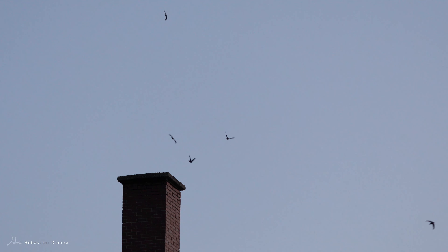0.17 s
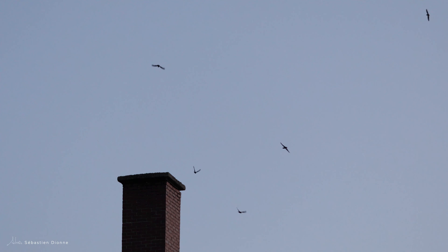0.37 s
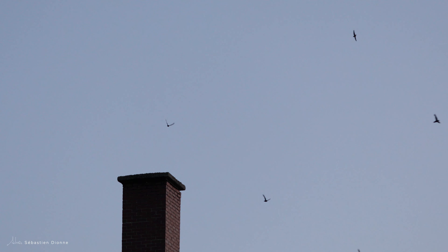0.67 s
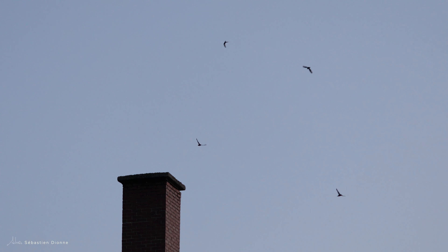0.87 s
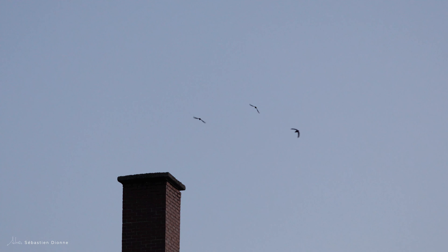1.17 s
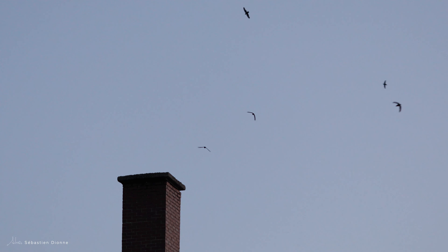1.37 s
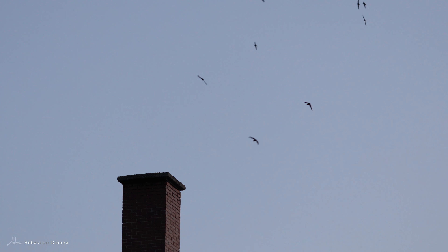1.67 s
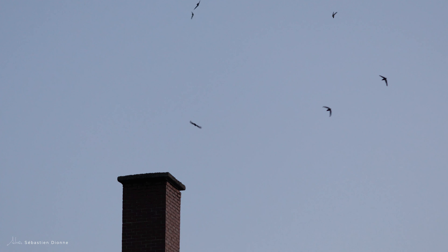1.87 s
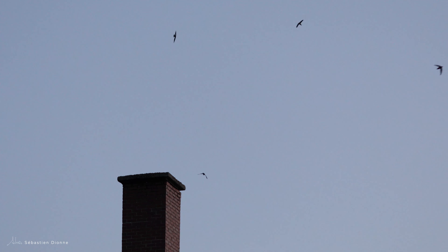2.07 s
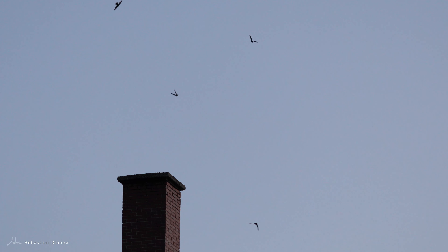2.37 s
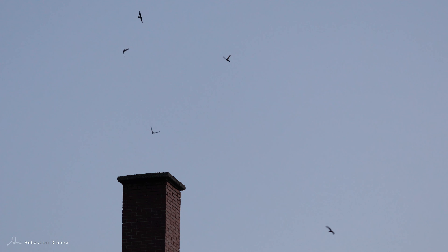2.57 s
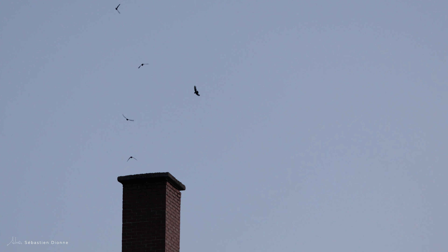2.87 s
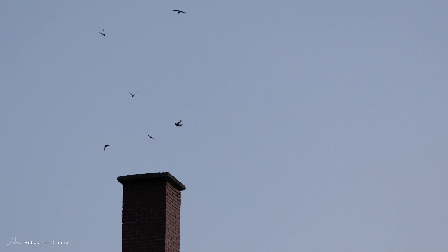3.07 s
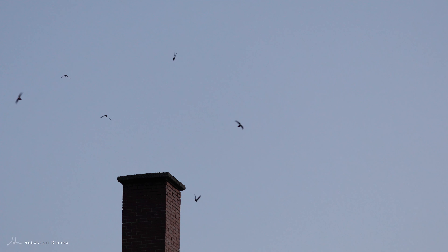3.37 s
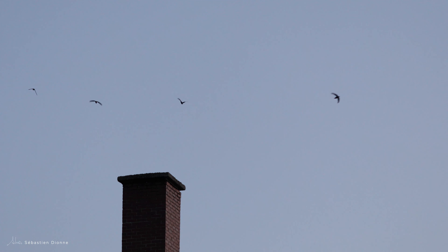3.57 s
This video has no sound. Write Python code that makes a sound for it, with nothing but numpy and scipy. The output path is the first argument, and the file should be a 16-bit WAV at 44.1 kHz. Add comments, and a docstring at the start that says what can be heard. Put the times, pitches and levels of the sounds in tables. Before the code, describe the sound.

A slowly approaching car crunches over gravelly ground, with cricket chirps and faint bird ticks

```python
"""Thin falling bird ticks open the scene, over a cricket that chirps in threes at dusk above the roofs.
The ticks are short hoarse sine glides; each chirp is three swelling tones, one for each wing stroke.
A car rolls slowly nearer: grainy coloured noise makes roar, crunch and sizzle, smooth coloured noise
a low drone, damped rings the popping stones, and bursts of banded noise the clicks of grit.
Distant traffic rumbles underneath as low coloured noise, with a steady wash of air."""
import sys
import numpy as np
from scipy import signal
from scipy.fft import rfft, irfft, next_fast_len
from scipy.io import wavfile
from scipy.ndimage import map_coordinates

SR = 44100
rng = np.random.default_rng(int(sys.argv[2]) if len(sys.argv) > 2 else 0)


def int16_out(signal):
    """Quantize to a 16-bit WAV file."""
    q = np.round(np.clip(np.atleast_2d(signal).T, -1, 1) * 32767)
    wavfile.write(sys.argv[1], SR, q.astype(np.int16))


N = 164052

# crunch of the tread on grit, which the sharp grains follow: start_s [s], level_db [dB]
CRUNCH_LEVEL = [(0, -65.5), (1.42, -70), (1.53, -63), (1.6, -69), (1.71, -62), (1.78, -61.5), (1.9, -54.5),
                (2.09, -63), (2.18, -52.5), (2.26, -53.5), (2.35, -54.5), (2.46, -57.5), (2.62, -55.5),
                (2.8, -55), (2.92, -51), (3.05, -52), (3.3, -49), (3.72, -52)]


def amp(db):
    """Decibels to gain."""
    return 10 ** (np.asarray(db) / 20)


def unit(x):
    """Scale to rms 1."""
    return x / np.sqrt(np.mean(x ** 2) + 1e-20)


def add(track, start_s, sound):
    """Mix a sound into the track at start_s, trimming what falls outside it."""
    start = round(start_s * SR)
    part = sound[max(-start, 0):max(N - start, 0)]
    first = max(start, 0)
    track[first:first + len(part)] += part


def wobble(rate, size):
    """A smooth random curve, rate knots a second."""
    knots = rng.standard_normal(int(size * rate / SR) + 4)
    return map_coordinates(knots, [np.arange(size) * rate / SR])


def level(points):
    """Gain per sample, in straight dB lines between (s, dB) points."""
    return amp(np.interp(np.arange(N) / SR, *np.transpose(points)))


def coloured(x, points):
    """x through a causal minimum-phase filter with the spectrum of (Hz, dB) points, at rms 1."""
    m = 2 * next_fast_len(N // 2 + 4096)
    hz, db = np.transpose(points)
    gain_db = np.interp(np.log(np.fft.rfftfreq(m, 1 / SR) + 1), np.log(hz), db)
    cepstrum = irfft(np.log(amp(gain_db)), m)
    # folding the cepstrum onto positive time makes the filter causal
    fold = np.r_[1, np.full(m // 2 - 1, 2), 1, np.zeros(m // 2 - 1)]
    response = np.exp(rfft(cepstrum * fold))
    return unit(irfft(rfft(x, m) * response, m)[:N])


def outdoors(x, wet_db):
    """The sound plus its faint scatter off walls and roofs, as a decaying noise tail."""
    yard_t60_s = 0.51
    t = np.arange(SR // 2) / SR
    tail = rng.standard_normal(len(t)) * amp(-60 * t / yard_t60_s)
    tail /= np.linalg.norm(tail)
    return x + amp(wet_db) * signal.fftconvolve(x, tail)[:N]


def gritty(share):
    """Smooth rolling noise mixed with the impulses of single grains; share sets the grain part."""
    grains_per_s, spread_db = 420, 4
    sizes = amp(spread_db * np.minimum(rng.exponential(size=N), 3)) * rng.choice([-1, 1], N)
    grains = unit(sizes * (rng.random(N) < grains_per_s / SR))
    share = np.clip(share, 0, 1)
    return share * grains + np.sqrt(1 - share ** 2) * rng.standard_normal(N)


def tyres():
    """The nearing car: a mid roar, a brighter crunch, a fine grainy sizzle that swells late, a low drone."""
    # tyre roar: start_s [s], level_db [dB]
    roar_level = [(0, -72), (.9, -69), (1.1, -60.5), (1.47, -59.5), (1.52, -52.5), (1.58, -57.5),
                  (1.69, -54.5), (1.77, -52.5), (1.92, -53.3), (2.08, -52.3), (2.23, -51.5), (2.42, -53),
                  (2.7, -51), (3.05, -51.5), (3.3, -49), (3.58, -47.5), (3.72, -48)]
    # spectrum of the roar: freq_hz [Hz], density_db [relative dB per Hz]
    roar_colour = [(70, -59.5), (220, -16), (370, -13), (435, -9), (540, -7.5), (640, 3), (730, -1),
                   (850, 0.5), (1150, 1.5), (1500, -4.5), (1900, -5.5), (2600, -29.5), (4000, -24.5),
                   (7500, -34.5), (15500, -68)]
    # spectrum of the crunch: freq_hz [Hz], density_db [relative dB per Hz]
    crunch_colour = [(80, -59), (400, -39), (900, -1.5), (1300, 3.5), (1900, 2), (2800, -4.5),
                     (4300, -15.5), (5800, -18.5), (7500, -16.5), (8600, -23), (10800, -21), (12500, -30),
                     (15500, -40)]
    # low drone of the nearing tyres: start_s [s], level_db [dB]
    drone_level = [(0, -72), (1.5, -69.5), (2.7, -63.5), (3.3, -57.5), (3.58, -59), (3.72, -56)]
    # spectrum of the drone: freq_hz [Hz], density_db [relative dB per Hz]
    drone_colour = [(40, -47), (85, -28.5), (165, -9), (230, -1.5), (370, -12), (435, 1.5), (480, 2.5),
                    (580, 1.5), (650, -3), (760, -14.5), (1500, -35)]
    # fine sizzle of sand, which carries only from close by: start_s [s], level_db [dB]
    sizzle_level = [(0, -105), (2.5, -79.5), (2.8, -70.5), (2.98, -70), (3.3, -67.5), (3.5, -71),
                    (3.72, -67.5)]
    # spectrum of the sizzle: freq_hz [Hz], density_db [relative dB per Hz]
    sizzle_colour = [(2500, -33), (5800, -4), (7400, 2.5), (8600, -0.5), (10600, 2), (12500, -8),
                     (15500, -31)]

    roar = level(roar_level) * coloured(gritty(share=0.25), roar_colour)
    crunch = level(CRUNCH_LEVEL) * coloured(gritty(share=0.6), crunch_colour)
    drone = level(drone_level) * coloured(rng.standard_normal(N), drone_colour)
    sizzle = level(sizzle_level) * coloured(gritty(share=0.37), sizzle_colour)
    unevenness = amp(0.77 * wobble(45, N))
    return (roar + crunch) * unevenness + sizzle + drone


def pops():
    """A stone snaps out from under the tread: a soft crack and a few dull cycles at its own pitch."""
    # stones popping under the tyres: start_s [s], peak_db [dB], pitch_hz [Hz]
    stones = [(1.5296, -38, 1250), (1.673, -41, 1150), (1.7006, -39, 1720), (1.7256, -39, 1460),
              (1.824, -43, 1210), (2.007, -40, 990), (2.162, -36, 1500), (2.2026, -28, 920),
              (2.2062, -39, 750), (2.266, -34, 1510), (2.307, -37, 1410), (2.5188, -30.5, 1160),
              (2.5216, -35, 1230), (2.676, -35.5, 1130), (2.681, -37, 1100), (2.7559, -35, 1310),
              (2.8953, -37.5, 1480), (3.188, -31.5, 1110), (3.3777, -31, 1230), (3.524, -34, 960),
              (3.5745, -36.5, 950)]
    # ring of stone and tread: ratio [multiple of the pitch], mode_db [dB], t60_s [s]
    ring_modes = [(.7, -7, .025), (1, 3, 0.017), (1.4, 2.5, 0.0063), (1.9, -4.5, 0.0046)]
    crack_db, crack_t60_s = -21, 0.0066
    out, t = np.zeros(N), np.arange(SR // 25) / SR
    band = signal.butter(3, (520, 2900), 'bandpass', fs=SR, output='sos')
    for start_s, peak_db, pitch_hz in stones:
        ring = sum(amp(mode_db - 60 * t / t60_s) * np.sin(2 * np.pi * pitch_hz * ratio * t)
                   for ratio, mode_db, t60_s in ring_modes)
        crack = amp(crack_db - 60 * t / crack_t60_s) * rng.standard_normal(len(t))
        pop = signal.sosfilt(band, ring + crack)
        add(out, start_s, amp(peak_db) * pop / np.abs(pop).max())
    return outdoors(out, wet_db=-12)


def wall(x):
    """A nearby wall repeats the road sound a few milliseconds later."""
    delay_s, echo_db = .00702, -12.5
    echo = np.pad(x, (round(delay_s * SR), 0))[:N]
    return x + amp(echo_db) * echo


def spitting():
    """Sparse sharp grains crack under the tread, louder as the crunch grows."""
    # spectrum of the sharp grains: freq_hz [Hz], density_db [relative dB per Hz]
    spit_colour = [(500, -23), (1500, 2), (4000, -1), (7500, 0.5), (11000, -4), (15500, -22)]
    grains_per_s, below_crunch_db, spread_db = 30, -20.5, 4.5
    sizes = amp(spread_db * np.minimum(rng.exponential(size=N), 2))
    grains = sizes * (rng.random(N) < grains_per_s / SR)
    return amp(below_crunch_db) * level(CRUNCH_LEVEL) * coloured(grains, spit_colour)


def clicks():
    """Tiny bright clicks of flung grit: decaying noise around a centre frequency."""
    # small sharp clicks: start_s [s], peak_db [dB], centre_hz [Hz]
    grit_hits = [(.7315, -56, 9600), (.8205, -50.5, 5500), (0.867, -51, 4376), (0.991, -50.5, 6500),
                 (1.2215, -51, 6500), (1.245, -51, 10000), (1.53, -54, 8600), (1.7, -49, 3000),
                 (2.2026, -48, 5500), (2.292, -43.5, 8300), (2.397, -47, 6900), (2.4414, -44.5, 7700),
                 (2.5183, -46.5, 7100), (2.645, -49, 9600), (2.757, -47, 5000), (2.871, -52, 8240),
                 (2.894, -51, 4960), (3.0156, -48, 10920), (3.308, -47, 9000)]
    t60_s, width_octaves, top_hz = 0.0081, 0.4, 12500
    out, t = np.zeros(N), np.arange(2048) / SR
    hz = np.fft.rfftfreq(len(t), 1 / SR) + 1
    treble_cut = 1 + (hz / top_hz) ** 8
    for start_s, peak_db, centre_hz in grit_hits:
        band = 1 / (1 + (np.log2(hz / centre_hz) / width_octaves) ** 2) / treble_cut
        click = irfft(rfft(rng.standard_normal(len(t))) * band) * amp(-60 * t / t60_s)
        add(out, start_s, amp(peak_db) * click / np.abs(click).max())
    return out


def cricket():
    """Each wing stroke is a swelling tone with an overtone; it rises a little, then sags as the file slows."""
    # chirps: start_s [s], level_db [dB], pitch_hz [Hz], first_db [extra dB on the first stroke]
    chirp_table = [(-.050, -53, 5400, 8), (0.366, -53, 5420, 4.5), (0.8427, -53, 5410, 1.5),
                   (1.301, -52.5, 5420, 2.5), (1.799, -52.5, 5400, 2), (2.768, -52.5, 5400, -0.5),
                   (3.3255, -52.5, 5400, 2)]
    # wing strokes of a chirp: delay_s [s after its start], length_s [s], stroke_db [relative dB],
    # offset_hz [Hz from the chirp's pitch], sag_hz [Hz]
    wing_strokes = [(0, 0.0178, -1, -65, 460), (.0325, 0.023, 3, 9, 610), (.0715, 0.0238, 3.5, 24, 630)]
    swell_power, overtone_db, tooth_rough = 0.57, -19.5, 0.088
    rise_hz = 60.3
    sag_from, sag_curve = .33, 1.55  # share of the stroke where slowing begins, and how it steepens
    out = np.zeros(N)
    for start_s, level_db, pitch_hz, first_db in chirp_table:
        for k, (delay_s, length_s, stroke_db, offset_hz, sag_hz) in enumerate(wing_strokes):
            u = np.linspace(0, 1, int(length_s * SR))  # progress through the stroke
            starting = np.maximum(1 - u / sag_from, 0)
            slowing = np.maximum((u - sag_from) / (1 - sag_from), 0) ** sag_curve
            hz = pitch_hz + offset_hz - rise_hz * starting - sag_hz * slowing
            phase = 2 * np.pi * np.cumsum(hz) / SR
            roughness = 1 + tooth_rough * wobble(900, len(u))
            swell = np.abs(np.sin(np.pi * u)) ** swell_power * roughness
            # the overtone is swelled twice, so it is strongest mid-stroke
            tone = np.sin(phase) + amp(overtone_db) * swell * np.sin(2 * phase)
            gain = amp(level_db + stroke_db + first_db * (k == 0))
            add(out, start_s + delay_s, gain * swell * tone)
    return outdoors(out, wet_db=-19.5)


def birds():
    """Short, slightly hoarse whistles that fall fast and fade, rough in both phase and loudness."""
    # bird ticks: start_s [s], length_s [s], from_hz [Hz], to_hz [Hz], level_db [dB]
    tick_table = [(.008, .016, 6300, 5230, -56), (.085, .012, 6450, 6100, -63),
                  (.094, .018, 5100, 3900, -66), (.119, .012, 6200, 5400, -65),
                  (.148, .0095, 6370, 5900, -65), (.2145, 0.014, 7700, 6750, -56),
                  (0.22, .017, 6600, 4200, -65), (.288, 0.013, 6600, 6150, -55.5),
                  (.326, 0.019, 6650, 5050, -56.5), (0.341, .012, 5000, 4000, -65),
                  (0.4, .008, 6600, 5800, -62), (0.429, .01, 5400, 5100, -61),
                  (0.436, .011, 6700, 5400, -57), (.446, .018, 4900, 4400, -62),
                  (0.491, .016, 5120, 4200, -62), (1.162, 0.0088, 6600, 6100, -64),
                  (1.276, .011, 5450, 4850, -63), (1.277, .007, 7000, 6160, -63),
                  (1.506, .009, 6450, 6000, -66), (1.56, .009, 7000, 6400, -64),
                  (1.572, 0.015, 6100, 4200, -66), (1.608, 0.011, 5940, 5660, -64),
                  (1.775, .011, 5270, 5000, -61), (2.084, .012, 5900, 5600, -68),
                  (2.104, 0.016, 5960, 5100, -65), (2.383, 0.017, 6260, 5840, -64),
                  (2.454, 0.016, 6200, 5260, -64), (2.564, .018, 5430, 4600, -67),
                  (2.941, 0.018, 2520, 2370, -47), (3.146, .016, 6600, 6100, -60),
                  (3.199, 0.02, 6000, 5600, -63), (3.386, .014, 6350, 5600, -56),
                  (3.436, 0.018, 5800, 5400, -59), (3.473, 0.012, 5900, 5360, -56.5),
                  (3.487, 0.02, 5960, 4500, -57.5), (3.565, .018, 5150, 5000, -61),
                  (3.682, .014, 5700, 5100, -63)]
    ramp_s, fade_db = 0.0024, 6.5
    rough = .36  # radians of phase, and share of loudness
    out = np.zeros(N)
    for start_s, length_s, from_hz, to_hz, level_db in tick_table:
        u = np.linspace(0, 1, int(length_s * SR))  # progress through the tick
        hz = from_hz + (to_hz - from_hz) * u
        phase = 2 * np.pi * np.cumsum(hz) / SR + rough * wobble(1200, len(u))
        ramps = np.clip(np.minimum(u, 1 - u) * length_s / ramp_s, 0, 1)
        shape = ramps * amp(level_db - fade_db * u ** 2)
        add(out, start_s, shape * (1 + rough * wobble(680, len(u))) * np.sin(phase))
    return outdoors(out, wet_db=-8.5)


def town():
    """Low traffic rumble, slowly growing, under a steady wash of air; both are coloured noise."""
    # spectrum of the distant traffic: freq_hz [Hz], density_db [relative dB per Hz]
    traffic_colour = [(25, -24.5), (42, -27.5), (62, -21.5), (82, -39), (105, -19), (140, -12), (168, -6),
                      (200, -5.5), (222, 3.5), (260, -1.5), (295, 0.5), (360, -10.5), (450, -12),
                      (700, -36)]
    # spectrum of the air: freq_hz [Hz], density_db [relative dB per Hz]
    air_colour = [(150, -40), (400, -13), (650, 0.5), (1000, -1), (1600, -9), (2900, -8.5), (4000, -16.5),
                  (6000, -22), (7400, -17.5), (8600, -25), (10300, -19), (12500, -30), (15500, -41)]
    start_db, rise_db_per_s, air_db = -62.5, 0.6, -60.5
    rumble_db = start_db + rise_db_per_s * np.arange(N) / SR + 0.75 * wobble(7.23, N)
    rumble = amp(rumble_db) * coloured(rng.standard_normal(N), traffic_colour)
    air = amp(air_db) * coloured(rng.standard_normal(N), air_colour)
    return rumble + air


def scene():
    """All sources at one microphone."""
    road = wall(tyres() + pops())
    return (road + spitting() + clicks() + cricket() + birds() + town())[None]


def record(dry):
    """The microphone's recorder keeps nothing above its band limit."""
    top_hz = 15700
    m = next_fast_len(N + 8192)
    kept = np.fft.rfftfreq(m, 1 / SR) < top_hz
    return irfft(rfft(dry, m) * kept, m)[:, :N]


dry = scene()
out = record(dry)
int16_out(out)
```